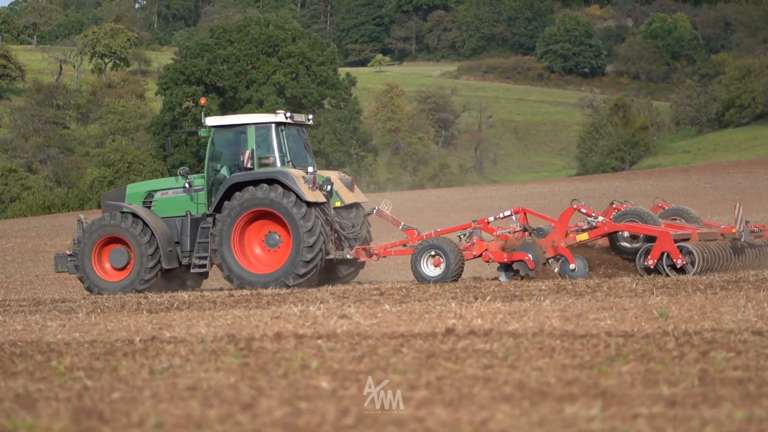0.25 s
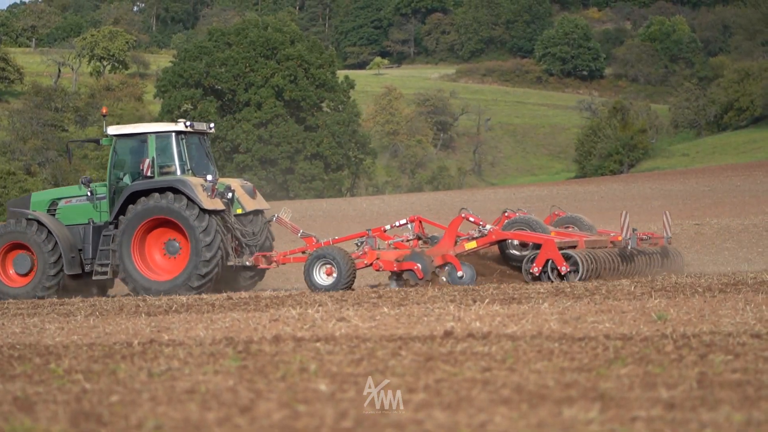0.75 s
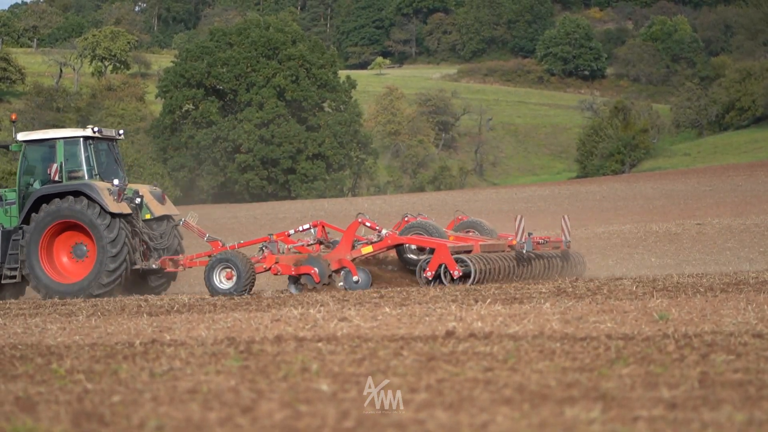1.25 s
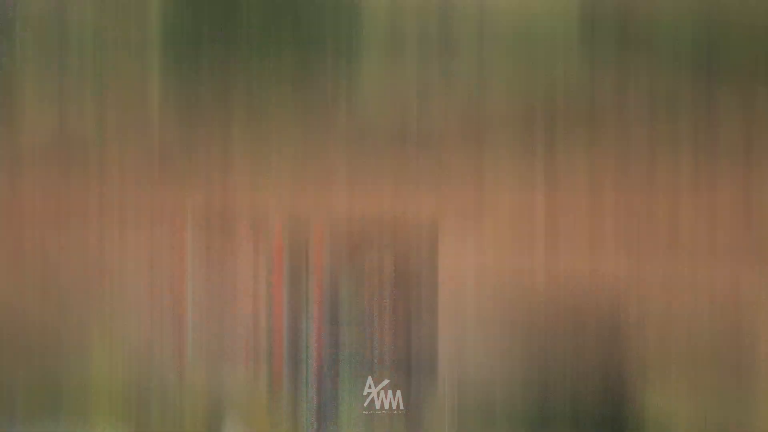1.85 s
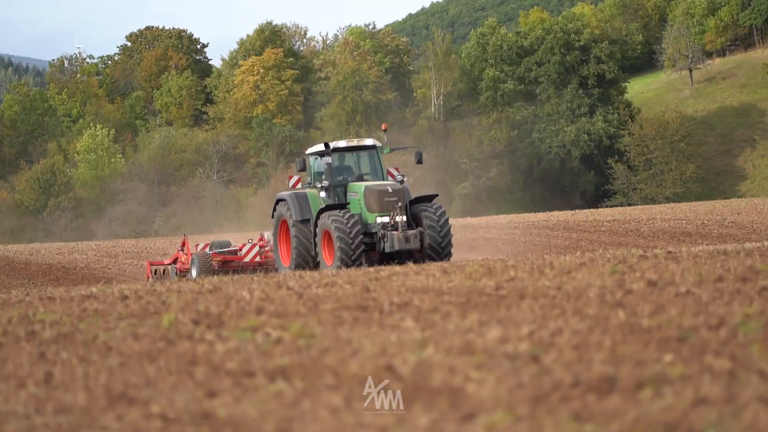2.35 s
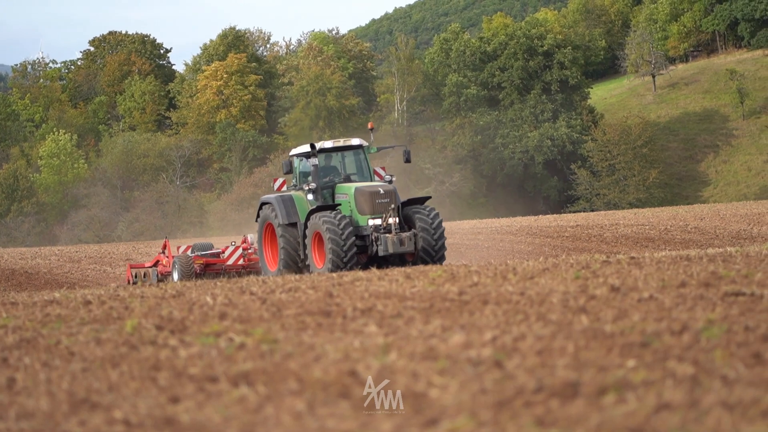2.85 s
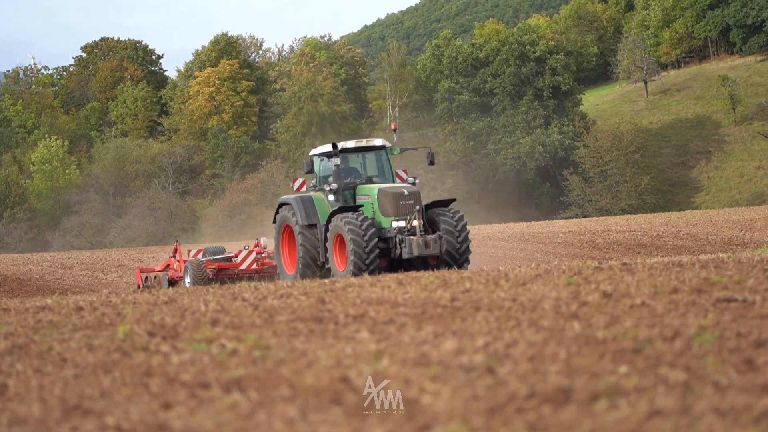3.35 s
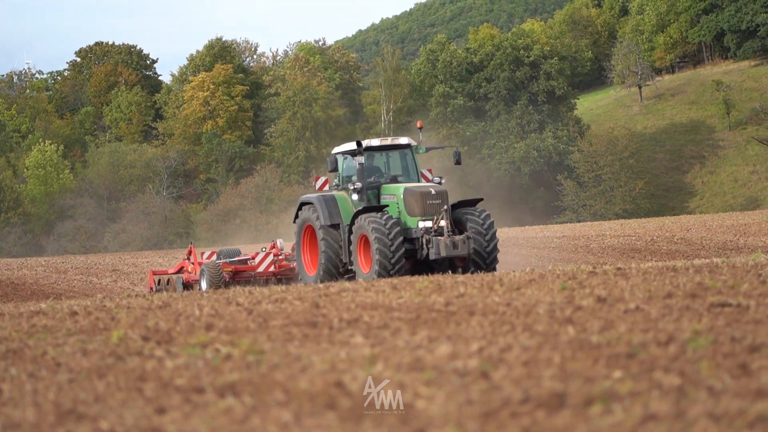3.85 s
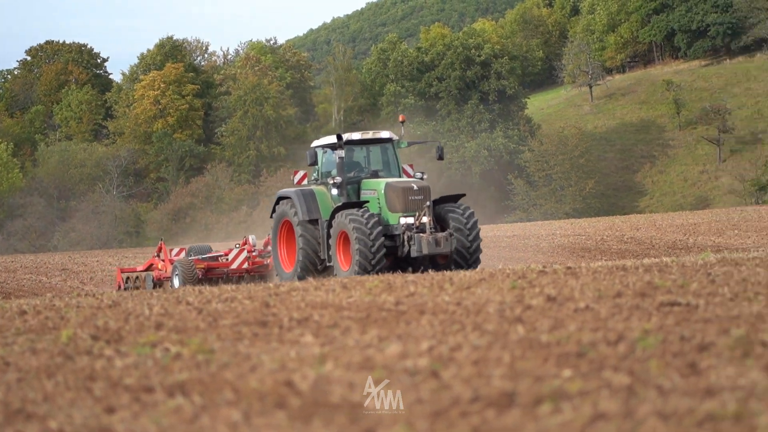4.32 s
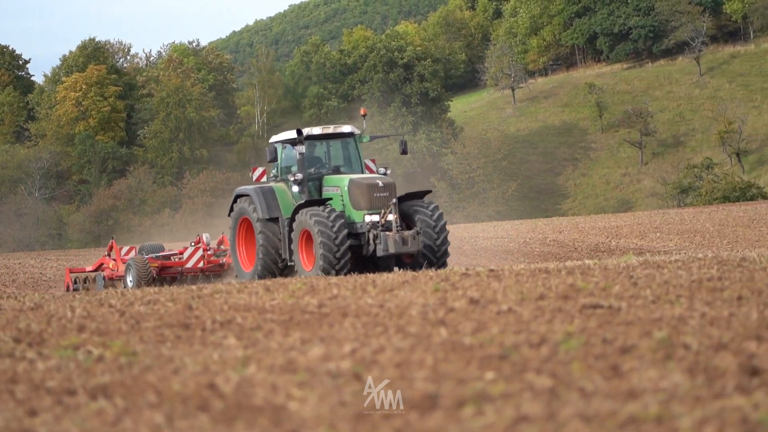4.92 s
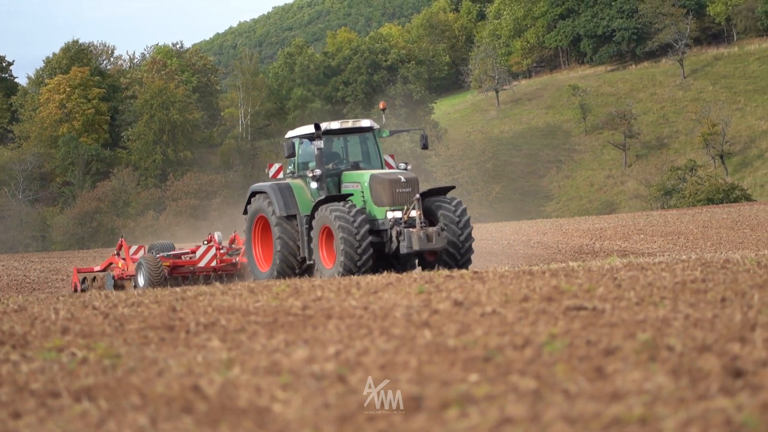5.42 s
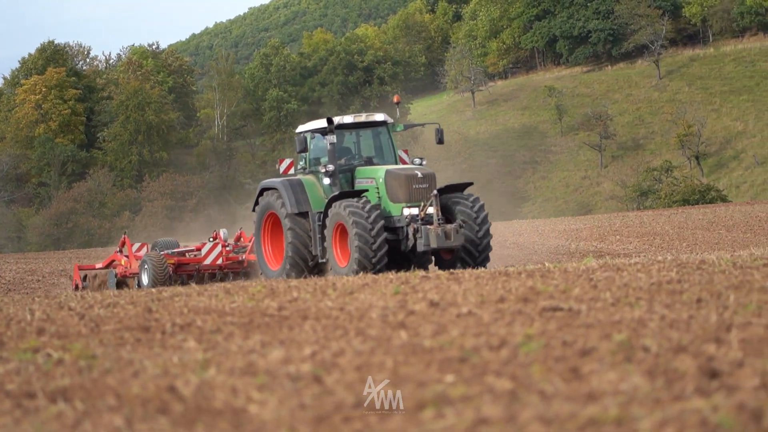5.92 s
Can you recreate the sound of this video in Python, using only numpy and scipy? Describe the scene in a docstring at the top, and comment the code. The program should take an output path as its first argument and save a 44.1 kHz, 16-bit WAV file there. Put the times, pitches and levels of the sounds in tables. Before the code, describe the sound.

A big diesel tractor roars past close by and moves away, then abruptly works farther off with clattering knocks, while wind buffets the microphone.

```python
"""A big six-cylinder diesel tractor roars close by and moves away, dragging a disc harrow over dry soil: firing-
gated noise, gear whines and two frame knocks. A hard cut leads to a second pass, far off and coming nearer:
combustion knocks ring the block, bonnet and valve gear, a clatter that swells and fades in the moving air.
Wind, as low-frequency noise, buffets the microphone throughout; the input stage flattens its peaks."""
import sys
import numpy as np
from scipy import signal
from scipy.fft import rfft, irfft, next_fast_len
from scipy.io import wavfile
from scipy.ndimage import uniform_filter1d, map_coordinates

SR = 44100
rng = np.random.default_rng(int(sys.argv[2]) if len(sys.argv) > 2 else 0)


def unload_audio(sound):
    """Save the sound as a 16-bit wav file, at the path given as the first command line argument."""
    columns = np.transpose(np.atleast_2d(sound))
    # keep every value between -1 and 1, then stretch to whole-number steps
    steps = np.round(np.clip(columns, -1, 1) * 32767)
    wavfile.write(sys.argv[1], SR, steps.astype(np.int16))


N = 272538
T = np.arange(N) / SR  # seconds


def amp(db):
    """Decibels to linear gain."""
    return 10 ** (np.asarray(db) / 20)


def unit(x):
    """x at rms 1."""
    return x / np.sqrt(np.mean(x ** 2) + 1e-20)


def curves(rows):
    """One value per sample for each column after the time."""
    time_s, *columns = np.transpose(rows)
    return [np.interp(T, time_s, column) for column in columns]


def wobble(knots_per_s):
    """A smooth random curve."""
    knots = rng.standard_normal(int(N * knots_per_s / SR) + 4)
    return map_coordinates(knots, [T * knots_per_s])


def filtered(x, response):
    """x through a response given as a function of frequency in Hz."""
    size = next_fast_len(N + SR // 2)
    spectrum = rfft(x, size) * response(np.fft.rfftfreq(size, 1 / SR))
    return irfft(spectrum, size)[..., :N]


def coloured(x, points):
    """x through (Hz, dB) gain points on a log frequency axis, at rms 1."""
    point_hz, gain_db = np.transpose(points)
    return unit(filtered(x, lambda hz: amp(np.interp(np.log(hz + 1), np.log(point_hz + 1), gain_db))))


def resonant(x, modes):
    """x twice through (Hz, width in Hz, dB) resonances of alternating sign, so valleys stay dark; rms 1."""
    def response(hz):
        total = 0
        for k, (centre_hz, width_hz, db) in enumerate(modes):
            damping = 1j * hz * width_hz
            total = total + (-1) ** k * amp(db / 2) * damping / (centre_hz ** 2 - hz ** 2 + damping)
        return total ** 2
    return unit(filtered(x, response))


def patchy(spread_db):
    """White noise whose gain varies in small patches of time and frequency, as turbulent air makes it."""
    z = signal.stft(rng.standard_normal(N), nperseg=512)[2]
    field = uniform_filter1d(rng.standard_normal(z.shape), size=6, axis=0)
    field = uniform_filter1d(field, size=10, axis=1)
    return signal.istft(z * amp(spread_db * unit(field)), nperseg=512)[1][:N]


def evened(x, share):
    """Noise with part of its own swelling taken out, so that the gust curve mostly sets its strength."""
    envelope = np.abs(signal.hilbert(x, next_fast_len(N))[:N])
    return unit(x / (envelope + 0.11) ** share)


def firing_gate(firing_hz, sharp, scatter_db, steady):
    """A burst for each firing, of random size with a pattern over the six cylinders, on a steady share."""
    cycles = np.cumsum(firing_hz) / SR
    index = np.floor(cycles).astype(int)
    per_firing = rng.standard_normal(N // 100)[index]
    per_cylinder = rng.standard_normal(6)[index % 6]
    size_db = scatter_db * (per_firing + 0.28 * per_cylinder)
    return steady + amp(size_db) * np.sin(np.pi * (cycles - index)) ** sharp


def tone(hz, rms_db, waver_db):
    """A sine whose strength wavers around rms_db."""
    level = np.sqrt(2) * amp(rms_db + waver_db * wobble(14))
    return level * np.sin(2 * np.pi * np.cumsum(hz) / SR)


def ring(start_s, db, modes):
    """Damped modes (Hz, dB, t60 in s) struck at start_s."""
    t = np.maximum(T - start_s, 0)
    body = sum(amp(g - 60 * t / t60_s) * np.sin(2 * np.pi * hz * t) for hz, g, t60_s in modes)
    return amp(db) * (1 - np.exp(-t / 0.0015)) * body


def microphone_hiss():
    """Steady self-noise of the microphone."""
    # Each row: frequency in Hz, gain in dB.
    hiss_spectrum = [(3000, -20), (7000, 0), (12500, -4), (15700, -9)]
    return amp(-81.5) * coloured(rng.standard_normal(N), hiss_spectrum)


def wind():
    """Slow pushes and lumpy buffeting on the microphone, both low-frequency noise."""
    # Slow push. Each row: time in seconds, level in dB.
    push_rows = [(0, -29), (.4, -39), (.58, -36), (.68, -8), (.8, -12), (.92, -22), (1.03, -12),
                 (1.25, -23), (1.37, -7), (1.55, -14), (2.0, -15), (2.5, -9.5), (2.85, -15), (3.4, -9),
                 (3.7, -10), (4.05, -8.5), (4.3, -17), (4.45, -9), (4.7, -8.5), (4.82, -20), (5.2, -16),
                 (5.42, -26), (5.62, -17), (5.85, -21), (6.02, -11), (6.15, -12)]
    # Bursts of buffeting. Each row: centre in seconds, level in dB, length in seconds.
    bursts = [(.64, -17, .03), (1.45, -21, .04), (2.02, -17, .05), (2.2, -17, .06), (2.44, -11, .07),
              (2.73, -13, .05), (2.97, -10, .05), (3.09, -7, .04), (3.23, -13, .09), (3.54, -9, .04),
              (3.62, -15, .04), (4.04, -17, .04), (4.8, -15, .07), (5.25, -24, .1), (5.55, -24, .08),
              (6.12, -15, .07)]
    # Spectra. Each row: frequency in Hz, gain in dB.
    push_spectrum = [(2, -42), (5, -12), (11, 21), (18, 17.5), (26, 3), (60, -55.5), (300, -140)]
    buffet_spectrum = [(14, -41), (26, 2), (36, 1.5), (55, -9.5), (110, -20), (200, -32), (300, -41),
                       (1000, -89), (3000, -140)]
    push_db = uniform_filter1d(curves(push_rows)[0], size=900)
    # steady buffeting is -27 dB at a push of -12 dB and takes half of its swing
    lumps = amp(-27 + .5 * (push_db + 12))
    for centre_s, db, length_s in bursts:
        lumps += amp(db) * np.exp(-((T - centre_s) / length_s) ** 2)
    push = amp(push_db) * evened(coloured(rng.standard_normal(N), push_spectrum), share=0.57)
    buffet = lumps * evened(coloured(rng.standard_normal(N), buffet_spectrum), share=0.53)
    return filtered(push + buffet, lambda hz: 1 / (1 + (hz / 400) ** 6))


def near_rumble(rumble_db):
    """Chassis rumble close by: low noise."""
    # Each row: frequency in Hz, gain in dB.
    rumble_spectrum = [(40, -17), (90, 2), (140, 0), (175, 2.5), (200, -12.5), (300, -14), (340, -34),
                       (1000, -75)]
    return amp(rumble_db + 1.2 * wobble(8)) * coloured(patchy(0.48), rumble_spectrum)


def soil_fizz(gate, roar_db, dust_db):
    """Soil fizz and, above it, dust hiss: firing-gated noise."""
    # Each row: frequency in Hz, gain in dB.
    fizz_spectrum = [(3000, -15), (4000, -6.5), (4900, -4), (6300, -16.5), (7600, -27.5), (10000, -59.5)]
    dust_spectrum = [(5000, -31), (7600, -2.5), (9500, 1), (12500, -5.5), (15700, -16)]
    # fizz starts near -34 dB, swings with the dust and fades with the roar
    fizz_db = -34 + (dust_db - dust_db[0]) / 2 + 1.2 * (roar_db - roar_db[0])
    fizz_db += 0.69 * wobble(7.76)
    fizz = amp(fizz_db) * coloured(gate * patchy(2.3), fizz_spectrum)
    dust = amp(dust_db + .6 * wobble(12)) * coloured(gate * patchy(1.2), dust_spectrum)
    return fizz + dust


def gear_whine(firing_hz):
    """Gear whines: jittering tones locked to the firing rate."""
    # Whine frequencies as multiples of the firing rate.
    orders = [4.22, 8.5, 12, 17]
    # Each row: time in seconds, then the level of each of the four whines in dB.
    whine_rows = [(0, -48, -42, -36, -52), (.22, -50, -33, -39, -56), (.45, -50, -35, -35, -56),
                  (.57, -44, -37, -44, -54), (.67, -42, -36, -32, -48), (.85, -54, -41, -43, -42),
                  (1.2, -45, -38, -38, -44), (1.38, -43, -46, -40, -54), (1.6, -46, -36, -44, -52),
                  (1.9, -52, -39, -44, -48)]
    whine = 0
    for order, db in zip(orders, curves(whine_rows)):
        whine = whine + tone(order * firing_hz * (1 + .006 * wobble(45)), db, 2.2)
    return whine


def harrow_knocks():
    """Knocks ring the harrow frame; a steel part struck just before the start still rings."""
    # Each row: start in seconds, level in dB before a 1 dB cut.
    knocks = [(1.227, -10.5), (1.412, -19)]
    # Modes of the frame and of the steel part. Each row: frequency in Hz, level in dB, t60 in seconds.
    frame_modes = [(286, 2.5, 0.07), (392, -3.5, 0.06)]
    steel_modes = [(9200, -36, .06), (12500, -45, .05)]
    return sum(ring(s, db - 1.0, frame_modes) for s, db in knocks) + ring(-.004, 0, steel_modes)


def leaving():
    """Close by: a strong firing note, a nearly smooth roar of fan, tyres and soil, gear whines and knocks."""
    # Firing rate, sagging as the tractor moves away. Each row: time in seconds, rate in Hz.
    firing_rows = [(0, 72.2), (.4, 72.2), (.75, 70.9), (1.25, 69.7), (1.6, 70.0), (1.9, 70.6)]
    # Each row: time in seconds, roar (before a 1.3 dB lift), dust hiss and chassis rumble levels in dB.
    level_rows = [(0, -24, -54, -26), (.5, -24.5, -55.5, -26), (.63, -24.5, -51, -25),
                  (.8, -27, -57.5, -22.5), (1.04, -28, -53, -22), (1.25, -28.5, -59.5, -21),
                  (1.62, -28.5, -56, -22), (1.78, -30.5, -63, -25.5), (1.9, -34, -64, -28)]
    # Each row: frequency in Hz, gain in dB.
    roar_spectrum = [(200, 3.5), (300, -9), (340, -3), (600, 0), (860, 0.5), (2000, -2.5), (2200, -3.5),
                     (3500, -5), (4000, -16.5), (6000, -24), (8000, -36), (16000, -74)]
    firing_hz, = curves(firing_rows)
    roar_db, dust_db, rumble_db = curves(level_rows)
    gate = firing_gate(firing_hz, sharp=3.9, scatter_db=-6.0, steady=4.5)
    note_db = -18 + .25 * (roar_db - roar_db[0])  # fades by a quarter of the roar's fading
    note = tone(firing_hz, note_db, 1.1) + tone(2 * firing_hz, note_db - 17, 1.4)
    roar = amp(roar_db + 1.3) * coloured(gate * patchy(0.6), roar_spectrum)
    surface = near_rumble(rumble_db) + soil_fizz(gate, roar_db, dust_db)
    return surface + gear_whine(firing_hz) + harrow_knocks() + note + roar


def far_rumble(rumble_db):
    """Chassis rumble from afar: low noise."""
    # Each row: frequency in Hz, gain in dB.
    rumble_spectrum = [(60, -12), (110, -6), (200, 4), (240, -9.5), (300, -15), (450, -19), (1000, -59.5),
                       (4000, -140)]
    return amp(rumble_db + 5.5) * coloured(patchy(1.0), rumble_spectrum)


def top_hiss(knock, valve_db):
    """Faint knock-gated top hiss that swells 50 ms after the valve tick."""
    # Each row: frequency in Hz, gain in dB.
    hiss_spectrum = [(5000, -12), (7000, -3), (7800, -3), (10000, -3), (12500, -7), (15700, -14)]
    late_valve_db = np.interp(T - .05, T, valve_db)
    hiss_db = -76 + .9 * (late_valve_db + 55) + 2.2 * wobble(12)
    return amp(hiss_db) * coloured((knock + 1.5) * patchy(1.2), hiss_spectrum)


def turbo_whistle():
    """Turbocharger whistle: a jittering tone that sinks under load and recovers."""
    # Each row: time in seconds, frequency in Hz, level in dB.
    turbo_rows = [(1.9, 14300, -106), (2.8, 13380, -90), (3.2, 13170, -87), (3.55, 12870, -87),
                  (3.9, 12850, -88), (4.45, 13100, -83), (4.8, 13290, -90), (5.2, 13100, -89),
                  (6.18, 13020, -86)]
    turbo_hz, turbo_db = curves(turbo_rows)
    return tone(turbo_hz + 60 * wobble(250), turbo_db, 2.5)


def ground_dips(x):
    """Direct and ground path cancel in bands that slide up in pitch."""
    # Each row: centre in seconds, frequency in Hz, depth in dB, length in seconds.
    dips = [(1.98, 1800, 15, .1), (4.05, 430, 13, .4), (4.6, 2000, 5, .12), (5.12, 2150, 10, .13),
            (5.95, 2100, 7, .14)]
    width, slide = .17, .22  # band width, and climb over one length, as shares of the pitch
    hz, t, z = signal.stft(x, SR, nperseg=1024)
    loss_db = 0
    for centre_s, dip_hz, depth_db, length_s in dips:
        age = (t - centre_s) / length_s
        offset = (hz[:, None] / dip_hz - 1 - slide * age) / width
        loss_db = loss_db + depth_db * np.exp(-offset ** 2 - age ** 2)
    return signal.istft(z * amp(-loss_db), SR, nperseg=1024)[1][:N]


def dropouts():
    """A gain that falls within 1.5 ms, holds, and comes back over a few milliseconds."""
    # Brief losses of the clatter. Each row: start in seconds, depth in dB.
    drops = [(2.482, 16), (2.548, 12), (2.977, 10), (3.083, 11), (3.16, 8), (3.3, 7), (3.535, 8), (3.62, 6)]
    loss_db = 0
    for start_s, depth_db in drops:
        return_s = .0008 * depth_db  # deeper drops last longer
        fall = np.clip((T - start_s) / .0015, 0, 1)
        recovery = np.clip((T - start_s - .6 * return_s) / return_s, 0, 1)
        loss_db = loss_db + depth_db * fall * (1 - recovery)
    return amp(-loss_db)


def clatter(knock, bark_db, block_db, valve_db):
    """Exhaust bark, and combustion knocks exciting resonances of bonnet, block and valve gear."""
    # Exhaust bark. Each row: frequency in Hz, gain in dB.
    bark_spectrum = [(200, -22), (350, -4), (470, -4), (830, 0.5), (1000, -4.5), (1400, -8), (2500, -28.5),
                     (8000, -89.5)]
    # Resonances. Each row: frequency in Hz, width in Hz, gain in dB.
    bonnet_modes = [(1644, 132, 1), (1880, 300, 2.5), (2270, 320, 0), (2710, 490, -11)]
    block_modes = [(2969, 232, -1), (3280, 210, -2.5), (3575, 210, -4.5)]
    valve_modes = [(3830, 490, -5.5), (4396, 500, -2.5), (4910, 450, -0.5), (5500, 366, 0),
                   (5960, 580, -7.5), (7080, 1100, -23.5)]
    # Loudest single clacks of the block. Each row: start in seconds, level in dB before a 6.5 dB cut.
    clack_rows = [(2.119, -35), (2.717, -34), (2.7395, -30), (2.8096, -27.5), (2.8844, -28.5),
                  (3.0043, -23), (3.101, -35), (3.1716, -26), (3.6096, -39), (4.236, -27), (4.3448, -31),
                  (5.381, -24), (5.403, -26), (5.5493, -29.5), (6.0348, -29)]
    # the bonnet swells less than the block, and 90 ms earlier
    bonnet_db = -46.5 + .55 * (np.interp(T + .09, T, block_db) + 48)
    steady_clatter = amp(bark_db + 3.1) * coloured((knock + 0.96) * patchy(0.93), bark_spectrum)
    steady_clatter += amp(bonnet_db) * resonant((knock + 0.44) * patchy(1.1), bonnet_modes)
    steady_clatter += amp(block_db + 0.7) * resonant(knock * patchy(0.57), block_modes)
    steady_clatter += amp(valve_db) * resonant((knock + 0.73) * patchy(2.0), valve_modes)
    block_ring = resonant(rng.standard_normal(N), block_modes)
    bursts = sum(amp(db - 6.5) * np.exp(-((T - s - .004) / 0.0042) ** 2) for s, db in clack_rows)
    return dropouts() * (ground_dips(steady_clatter) + block_ring * bursts)


def nearing():
    """Far off: each combustion knock rings the block, bonnet and valve gear over a thin firing note."""
    # Firing rate, dipping under load. Each row: time in seconds, rate in Hz.
    firing_rows = [(1.9, 83.8), (2.4, 83.4), (2.9, 82.7), (3.4, 81.8), (4.1, 81.6), (5.0, 82.4),
                   (6.18, 83.7)]
    # Each row: time in seconds, firing tone, exhaust bark and chassis rumble levels in dB before trims.
    level_rows = [(1.92, -30, -43, -46), (2.1, -27, -39, -44), (2.6, -24, -39.5, -39),
                  (3.1, -26.5, -43, -37), (3.6, -28, -45, -40), (3.85, -26, -43, -43),
                  (4.45, -27, -48, -39), (4.9, -26, -41.5, -39), (5.3, -25.5, -42.5, -37.5),
                  (5.7, -24.5, -38, -35), (6.15, -23, -35, -35)]
    # What the air lets through. Each row: time in seconds, block knock (before trim) and valve tick in dB.
    carry_rows = [(1.92, -57, -64), (2.05, -56, -64), (2.17, -46, -62), (2.3, -46, -59), (2.42, -55, -58),
                  (2.62, -53, -60), (2.87, -37.5, -48), (3.13, -42, -48.5), (3.5, -48, -53),
                  (3.74, -56, -60), (3.96, -43, -52), (4.42, -46, -50), (4.7, -58, -59), (4.9, -50, -55),
                  (5.13, -43.5, -57), (5.25, -57, -61), (5.4, -41, -51), (5.65, -47, -56), (5.86, -51, -59),
                  (6.0, -50, -54), (6.12, -46, -55)]
    firing_hz, = curves(firing_rows)
    note_db, bark_db, rumble_db = curves(level_rows)
    block_db, valve_db = (uniform_filter1d(c, size=3000) for c in curves(carry_rows))
    knock = firing_gate(firing_hz, sharp=3.5, scatter_db=2.3, steady=.35)
    note = tone(firing_hz, note_db + 0.5, 0.98)
    note += tone(2 * firing_hz, note_db - 9.5 + 1.5 * wobble(3), 0.55)
    note += tone(4.17 * firing_hz, -54, 2.2)
    background = far_rumble(rumble_db) + top_hiss(knock, valve_db) + turbo_whistle()
    return background + note + clatter(knock, bark_db, block_db, valve_db)


def scene():
    """The two passes butt together; wind and microphone hiss run through both."""
    cut_s, join_s = 1.909, 0.00073
    later = np.clip((T - cut_s) / join_s, 0, 1)
    tractor = (1 - later) * leaving() + later * nearing()
    return (microphone_hiss() + wind() + tractor)[None]


def record(dry):
    """The input stage flattens the wind peaks, which chokes the treble riding on them; then the band limit."""
    squeezed = dry / (1 + np.abs(dry / 1.02) ** 6) ** (1 / 6)
    return filtered(squeezed, lambda hz: hz < 15720)


dry = scene()
out = record(dry)
unload_audio(out)
```